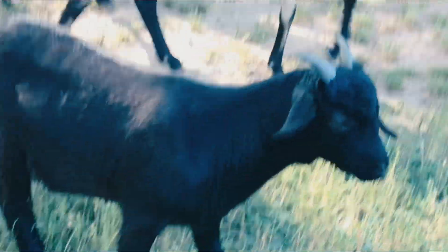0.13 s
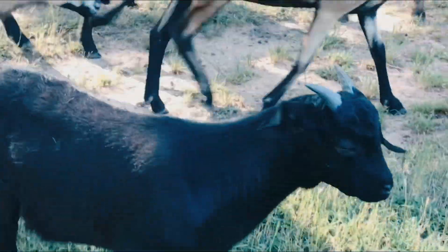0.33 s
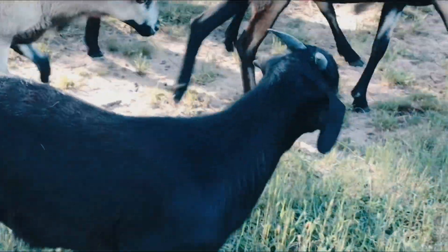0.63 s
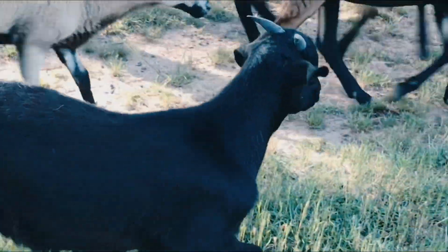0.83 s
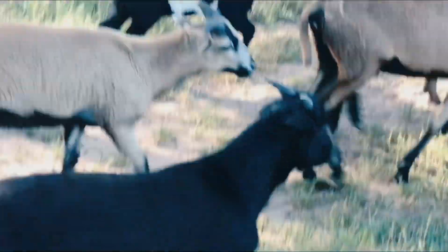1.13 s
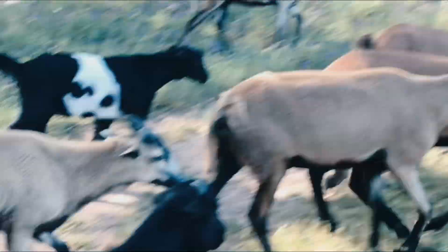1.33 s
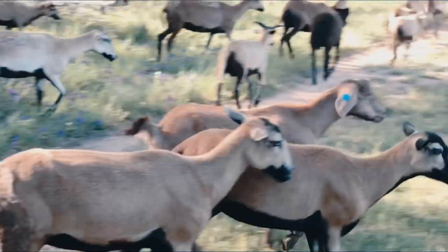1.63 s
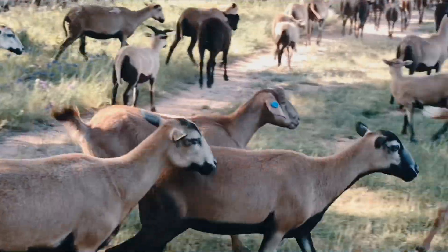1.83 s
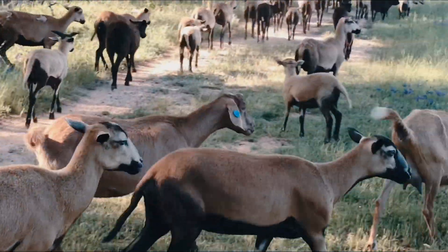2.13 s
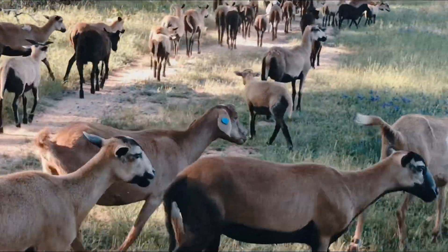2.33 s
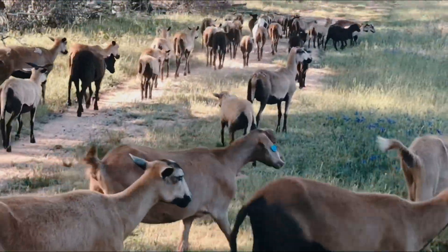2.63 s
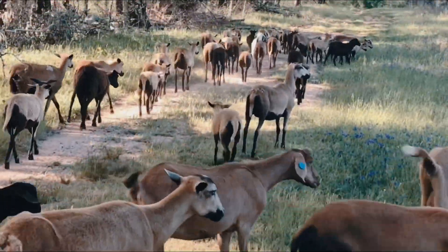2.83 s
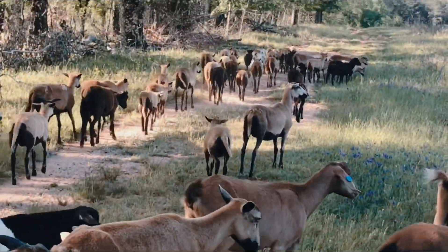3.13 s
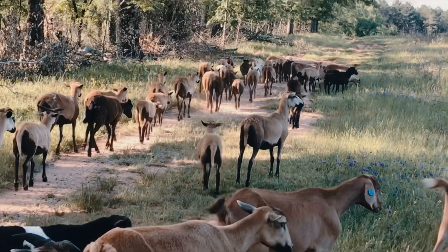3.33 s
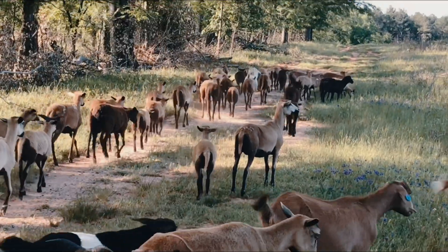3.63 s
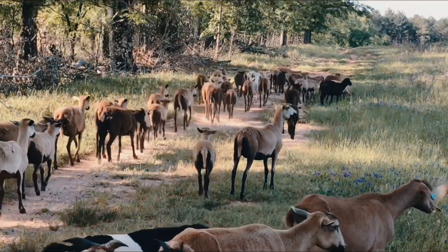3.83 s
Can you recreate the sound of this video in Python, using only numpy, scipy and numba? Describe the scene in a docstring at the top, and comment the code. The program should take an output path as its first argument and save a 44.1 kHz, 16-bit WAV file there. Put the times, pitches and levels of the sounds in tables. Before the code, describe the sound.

A faint, falling lamb bleat from far off, a quieter stretch of walking flock and small bird whistles, then a loud trembling ewe near the microphone, still calling at the end; open field beside trees, light echo.

```python
"""A flock walks through dry grass at the edge of a wood: banded noise rustles, damped sines thud, noise bursts
snap. Breeze noise and a low wavering sine hum last throughout. Small birds whistle in gliding sines from the start.
At 1 s a far lamb bleats in sobs: vocal-fold pulses through throat resonances. At 3.4 s a near ewe stutters,
hums through her nose and opens into a trembling baa: uneven pulses strike moving mouth resonances.
Noise with a decaying envelope echoes the voices from the tree line."""
import sys
import numpy as np
from scipy import signal
from scipy.fft import rfft, irfft
from scipy.io import wavfile
from scipy.ndimage import uniform_filter1d
from numba import njit

SR = 44100
rng = np.random.default_rng(int(sys.argv[2]) if len(sys.argv) > 2 else 0)


def pcm_store(signal):
    """Save signal as 16-bit PCM."""
    levels = np.round(np.clip(np.atleast_2d(signal), -1, 1) * 32767)
    wavfile.write(sys.argv[1], SR, levels.astype(np.int16).T)


def natural_amplitude(level_db):
    """Convert a level in decibels to a linear amplitude factor, elementwise."""
    exponent = np.asarray(level_db, float) / 20
    return 10 ** exponent


N = 176400

# Ewe's stutter: t/s, pitch f/Hz, nasal hum level/dB, muzzle ring level/dB, muzzle resonance f/Hz
STUTTER = [(3.37, 164.8, -61, -58, 1110), (3.394, 164, -68, -62, 1150), (3.42, 182.7, -38.5, -45, 1170),
           (3.444, 188.7, -73, -69, 1150), (3.452, 186.6, -40.5, -78, 1140), (3.468, 180, -75, -57, 1170),
           (3.492, 159.1, -55, -51, 1180), (3.51, 171.4, -46, -46, 1180), (3.526, 154.3, -45.5, -49, 1190),
           (3.546, 168.8, -49, -50, 1120), (3.568, 191.8, -38.5, -39, 1120),
           (3.598, 198.5, -33.5, -41, 990), (3.632, 189, -63, -55, 1010)]
# Fixed throat resonances, mouth nearly shut: f/Hz, width/Hz, relative level/dB
MUZZLE = [(2560, 210, 2), (400, 150, -2), (1390, 130, -1)]
# Ewe's hum through the nose: t/s, pitch f/Hz (not read), level/dB
NASAL = [(3.625, 193, -51), (3.653, 199, -35), (3.713, 202, -34.5), (3.743, 207, -34.5), (3.78, 211, -48)]
# Pitch of hum and baa: t/s, f/Hz
BAA_PITCH = [(3.625, 192.8), (3.677, 199.6), (3.691, 202.2), (3.725, 206.8), (3.815, 219.1), (3.831, 213.2),
             (3.845, 211.8), (3.873, 228.3), (3.881, 221.5), (3.897, 213.2), (3.915, 214.7), (3.933, 199),
             (3.945, 199), (3.965, 207.3), (3.971, 214.8), (4.0, 194)]
# Mouth opening in the baa: t/s, bray level/dB, upper bray level/dB, middle level/dB, middle f/Hz,
# jaw f/Hz, jaw level/dB, rasp level/dB
BAA = [(3.72, -72, -76, -61, 1440, 460, -53, -75), (3.746, -55, -54, -54, 1450, 430, -59, -61),
       (3.756, -42.5, -55, -50, 1510, 435, -53, -59), (3.78, -37, -45, -47, 1570, 450, -46, -59),
       (3.8, -33, -39, -40.5, 1560, 443, -44, -53), (3.818, -32, -30, -40, 1660, 460, -47, -43.5),
       (3.836, -31.5, -42, -35, 1690, 560, -46, -60), (3.852, -28.5, -35, -36, 1710, 590, -42, -43.5),
       (3.864, -32.5, -31, -38, 1550, 600, -41.5, -45.5), (3.883, -37.5, -54, -43.5, 1490, 620, -37, -50),
       (3.894, -28.5, -36.5, -35, 1670, 630, -41.5, -46), (3.923, -31, -39, -34, 1650, 615, -41.5, -51),
       (3.937, -35.5, -44, -46, 1580, 616, -40, -64), (3.948, -31.5, -41, -48, 1570, 604, -43, -65),
       (3.96, -33.5, -40, -35.5, 1610, 605, -40.5, -56), (3.988, -32, -40, -35.5, 1640, 630, -39.5, -52),
       (4.0, -35, -43, -41, 1590, 605, -42, -55)]
# Upper resonances of the open mouth: f/Hz, width/Hz, relative level/dB
UPPER_BRAY = [(2880, 100, 0), (3110, 230, -4)]
# Highest mouth resonances: f/Hz, width/Hz, relative level/dB
RASP = [(3915, 120, 10), (4600, 320, -10), (4910, 120, 2), (5680, 300, -9), (6800, 150, -3.5)]
# Far lamb, one row a sob: start t/s, length/s, pitch f/Hz before the sob's lift, level/dB
LAMB = [(1.034, 0.038, 406, -48.5), (1.109, 0.051, 379.6, -49), (1.185, 0.049, 369.5, -46),
        (1.264, 0.042, 359, -49.5), (1.341, 0.0312, 357, -50), (1.411, 0.052, 347.5, -50.5),
        (1.471, 0.051, 336.6, -57)]
# Lamb's throat resonances: f/Hz, width/Hz, relative level/dB
LAMB_THROAT = [(805, 310, -2.5), (936, 100, 3.5), (1520, 190, -6), (2110, 240, 2.5), (3560, 170, 1),
               (5720, 270, -5.5)]
# Bird whistles: start t/s, length/s, first f/Hz, last f/Hz, mean level/dB
BIRDS = [(0.241, .065, 4900, 5020, -57.5), (.375, 0.056, 4900, 5040, -59.5), (.09, .02, 4800, 4850, -62),
         (0.7, 0.195, 3530, 2610, -60), (1.425, 0.03, 4650, 4900, -66), (1.508, .036, 4620, 5080, -60.5),
         (1.583, .028, 4600, 4850, -56), (1.672, .017, 4680, 4900, -58), (1.743, .016, 4650, 4800, -61.5),
         (1.953, 0.032, 3540, 3380, -58), (1.983, .025, 3300, 3100, -59.5),
         (2.207, 0.027, 3450, 3300, -61.5), (2.238, .015, 3050, 2920, -63), (2.48, .025, 3950, 4000, -62),
         (2.547, 0.018, 3200, 3000, -59), (2.6, .02, 3250, 3080, -60), (2.65, .02, 3250, 2950, -60),
         (3.298, 0.034, 1373, 1306, -56.5)]
# Hoof thuds on soil: t/s, level/dB, f/Hz, contact (time to the envelope's peak)/s
THUDS = [(0.059, -40.5, 224, 0.0043), (0.064, -45.5, 374, 0.0056), (0.487, -38.5, 400, 0.0014),
         (0.31, -46, 428, 0.003), (.51, -46, 666, 0.0034), (0.553, -38.5, 70, 0.0074),
         (0.866, -48, 297, 0.012), (1.39, -42, 267, 0.0036), (1.499, -39.5, 54.6, 0.013),
         (3.391, -41.5, 283, 0.0085), (.356, -45.5, 330, 0.0023)]
# Snapped stalks: t/s, level of the noise before its band-pass/dB, f/Hz
SNAPS = [(.073, -37, 2500), (0.243, -31, 1000), (.312, -33, 890), (0.353, -37, 990), (0.54, -39.5, 1500),
         (1.115, -34, 900), (1.899, -51, 2000), (2.607, -38, 2800), (3.049, -35.5, 2260)]
# Legs brushing through grass: t/s, treble level about its mean/dB
RUSTLE = [(0.0, -53.5), (0.24, -59.5), (0.27, -56.5), (0.33, -59.5), (0.44, -57.5), (0.48, -61),
          (0.51, -55), (0.52, -60), (0.75, -58), (0.79, -64), (0.82, -57.5), (0.97, -59.5), (1.05, -51.5),
          (1.06, -56), (1.19, -59.5), (1.39, -50.5), (1.44, -60), (1.49, -52.5), (1.5, -56.5), (1.6, -60),
          (1.73, -58.5), (1.76, -59), (1.86, -57.5), (1.95, -58.5), (1.96, -55), (1.98, -62), (2.09, -58),
          (2.12, -57), (2.15, -60), (2.67, -60.5), (2.71, -63.5), (2.88, -60), (2.91, -62), (3.07, -62),
          (3.11, -62.5), (3.2, -60), (3.36, -61), (3.72, -60), (3.79, -64), (3.87, -59), (4.0, -57.5)]
# Spectrum of breeze and grass: f/Hz, relative level per Hz/dB
FIELD = [(15, -60), (25, -19), (43, -12), (64, -2.5), (80, -9), (97, -8), (111, -3), (120, -11), (175, -11),
         (427, -20.5), (516, -19), (2110, -24.5), (3430, -24.5), (8590, -29), (10400, -32.5), (12500, -32),
         (16000, -37)]
# Narrow dips in that spectrum: f/Hz, width/Hz, relative level/dB
DIPS = [(7800, 390, -2.5), (10420, 360, -3.5)]

NASAL_TAIL_DB, NASAL_OVERTONES_DB = -47.5, -26
BRAY_HZ, BRAY_WIDTH_HZ, MIDDLE_WIDTH_HZ, JAW_WIDTH_HZ = 2470, 115, 175, 110
LAMB_BETWEEN_DB = -14  # floor between sobs, re mean sob level
GLIDE_S = 0.058
FIELD_DB, HUM_HZ, HUM_DB = -47.5, 94.3, -50.5
NEAR_ECHO_DB, FAR_ECHO_DB = -22, -13
TOP_HZ = 15720


def unit(x):
    """Scale to rms 1."""
    return x / np.sqrt(np.mean(x ** 2))


@njit
def svf(x, hz, width):
    """State-variable band-pass with a moving centre."""
    y, b, l = np.empty(len(x)), 0., 0.
    for i in range(len(x)):
        g, k = np.tan(np.pi * hz[i] / SR), width / hz[i]
        v = (b + g * (x[i] - l)) / (1 + g * (g + k))
        b, l, y[i] = 2 * v - b, l + 2 * g * v, k * v
    return y


def svf_twice(x, hz, width):
    """A resonance with its skirts trimmed by a second one three times as wide."""
    hz = hz + np.zeros(len(x))
    return svf(svf(x, hz, 1. * width), hz, 3. * width)


def struck(x, hz, width):
    """A single resonance struck by each pulse, tilted down by a leaky integrator, rms 1."""
    ring = svf(x, hz + np.zeros(len(x)), 1. * width)
    return unit(signal.lfilter([1], [1, -.99], ring))


def throat(x, table):
    """Sum of resonances with alternating sign, rms 1."""
    total = 0
    for k, (hz, width, db) in enumerate(table):
        total = total + (-1) ** k * natural_amplitude(db) * unit(svf_twice(x, hz, width))
    return unit(total)


def walk(rate_hz):
    """Random levels held 1 / rate_hz s and smoothed twice, rms 1."""
    hold = int(SR / rate_hz)
    steps = np.repeat(rng.standard_normal(N // hold + 1), hold)
    return unit(uniform_filter1d(uniform_filter1d(steps, hold), hold)[:N])


def glottis(hz, jitter, shimmer_db, breath_db, count):
    """Vocal-fold pulses of uneven length and size, a puff of breath each cycle; also the bare fundamental."""
    cycle = (np.cumsum(hz) / SR).astype(int)
    chance = rng.standard_normal((cycle[-1] * 2 + 2, 2))
    turns = np.cumsum(hz * (1 + jitter * chance[cycle, 0])) / SR
    pulses = unit(sum(np.cos(2 * np.pi * k * turns) for k in range(1, count)))
    size = natural_amplitude(shimmer_db * chance[(turns + .5).astype(int), 1])
    puff = natural_amplitude(breath_db) * np.exp(-(turns % 1) / 0.48) * 2 * rng.standard_normal(len(hz))
    return size * pulses + puff, np.sqrt(2) * np.sin(2 * np.pi * turns)


def read(table):
    """Sample indices of a curve table, its columns, and soft ends (none at the end of the scene)."""
    rows = np.array(table).T
    i = np.arange(int(rows[0, 0] * SR), min(int(rows[0, -1] * SR), N))
    to_end = i[-1] - i + (N if i[-1] == N - 1 else 0)
    fade = np.clip(np.minimum(i - i[0], to_end) / 300, 0, 1)
    return i, [np.interp(i / SR, rows[0], c) for c in rows[1:]], fade


def ewe():
    """The ewe in sequence: stutter, then hum and baa."""
    return ewe_stutter() + ewe_baa()


def ewe_stutter():
    """Rough pulses ring the nearly shut muzzle over a nasal fundamental."""
    out = np.zeros(N)
    i, (hz, hum_db, ring_db, ring_hz), fade = read(STUTTER)
    pulses, tone = glottis(hz, jitter=.006, shimmer_db=1.2, breath_db=-16, count=20)
    muzzle = unit(svf_twice(pulses, ring_hz, 187.0)) + natural_amplitude(-8) * throat(pulses, MUZZLE)
    out[i] -= fade * (natural_amplitude(hum_db) * tone + natural_amplitude(ring_db) * muzzle)
    return out


def ewe_baa():
    """A clean nasal hum, then pulses ringing the open mouth."""
    out = np.zeros(N)
    i, (hz,), fade = read(BAA_PITCH)
    pulses, tone = glottis(hz, jitter=.004, shimmer_db=1.1, breath_db=-16, count=36)
    nose, mouth = np.array(NASAL).T, np.array(BAA).T
    hum_db = np.interp(i / SR, nose[0], nose[2], right=NASAL_TAIL_DB)
    bray_db, upper_db, middle_db, middle_hz, jaw_hz, jaw_db, rasp_db = (
        np.interp(i / SR, mouth[0], c) for c in mouth[1:])
    upper = 0
    for k, (f, width, db) in enumerate(UPPER_BRAY):
        upper = upper + (-1) ** k * natural_amplitude(db) * struck(pulses, f, width)
    voice = natural_amplitude(hum_db) * (tone + natural_amplitude(NASAL_OVERTONES_DB) * unit(svf_twice(pulses, 1260.0, 483.0)))
    voice += natural_amplitude(bray_db) * struck(pulses, BRAY_HZ, BRAY_WIDTH_HZ)
    voice += natural_amplitude(upper_db) * unit(upper)
    voice += natural_amplitude(middle_db) * struck(pulses, middle_hz, MIDDLE_WIDTH_HZ)
    voice += natural_amplitude(jaw_db) * struck(pulses, jaw_hz, JAW_WIDTH_HZ)
    voice += natural_amplitude(rasp_db) * throat(pulses, RASP)
    out[i] -= fade * voice
    return out


def lamb():
    """One quavering bleat of falling pitch; each sob swells the level and lifts the pitch."""
    rows = np.array(LAMB).T
    i = np.arange(int(rows[0, 0] * SR), int((rows[0, -1] + .12) * SR))
    t, shape, lift = i / SR, 0, 0
    for start, length, _, db in LAMB:
        attack = np.clip((t - start) / 0.0055, 0, 1)
        sob = attack * np.exp(-np.clip(t - start - length * .68, 0, None) / 0.0154)
        shape, lift = shape + natural_amplitude(db) * sob, lift + sob
    # the voice never quite stops between sobs
    shape = np.maximum(shape, natural_amplitude(rows[3].mean() + LAMB_BETWEEN_DB) * (t < rows[0, -1]))
    hz = np.interp(t, rows[0] + rows[1] / 2, rows[2])
    hz = hz * (1 + .012 * uniform_filter1d(lift - .7, 600))
    pulses, _ = glottis(hz, jitter=.011, shimmer_db=2.5, breath_db=-10, count=17)
    out = np.zeros(N)
    out[i] = np.clip((i - i[0]) / 200, 0, 1) * shape * throat(pulses, LAMB_THROAT)
    return out


def birds():
    """Gliding near-sine whistles that waver, breathier the farther the pitch is from its last."""
    out, waver, patchy = np.zeros(N), walk(110), walk(45)
    for start, length, first, last, db in BIRDS:
        u = np.linspace(0, 1, int(length * SR))
        i = int(start * SR) + np.arange(len(u))
        settle = np.expm1(-u * length / GLIDE_S) / np.expm1(-length / GLIDE_S)
        hz = first + (last - first) * settle
        phase = 2 * np.pi * np.cumsum(hz * (1 + .005 * waver[i - 900])) / SR
        air = unit(svf(rng.standard_normal(len(u)), hz, 350.)) * np.abs(hz - last) / 700
        level = natural_amplitude(db + 1.5 * patchy[i]) * np.sin(np.pi * u) ** .2
        out[i] += level * (np.sqrt(2) * np.sin(phase) + air)
    return out


def hooves():
    """Soil thuds as damped sines with grit; stalk snaps as band-passed decaying noise."""
    length = 3000
    out, t = np.zeros(N + length), np.arange(length) / SR
    for start, db, hz, contact in THUDS:
        i, u = int(start * SR), t / contact
        grit = unit(svf_twice(rng.standard_normal(length), 1.2 * hz, .8 * hz))
        body = np.sin(2 * np.pi * hz * t) + .3 * grit
        out[i:i + length] += natural_amplitude(db) * u * np.exp(1 - u) * body
    for start, db, hz in SNAPS:
        i = int(start * SR)
        burst = rng.standard_normal(length) * np.exp(-t / 0.01)
        out[i:i + length] += natural_amplitude(db) * svf(burst, np.full(length, 1. * hz), 0.75 * hz)
    return out[:N]


def field():
    """Breeze and grass: noise bands flicker alone, follow the legs in the treble, and crackle with grains."""
    f = np.maximum(np.fft.rfftfreq(N, 1 / SR), 1)
    curve = np.array(FIELD).T
    db = np.interp(np.log(f), np.log(curve[0]), curve[1])
    db = db + sum(dip * np.exp(-((f - c) / width) ** 2) for c, width, dip in DIPS)
    rows = np.array(RUSTLE).T
    legs_db = np.interp(np.arange(N) / SR, rows[0], rows[1] - rows[1].mean())
    # about 400 grains a second, random size and sign
    grain_db = np.minimum(2.5 * rng.exponential(size=N), 13)
    grains = (rng.random(N) < 400 / SR) * natural_amplitude(grain_db) * rng.choice([-1, 1], N)
    grains = np.diff(grains, prepend=0)
    noise = rfft(rng.standard_normal(N) + natural_amplitude(-5.5) * unit(grains)) * natural_amplitude(db)
    swish, gust, out = walk(13.0), walk(5.53), 0
    for octave in np.arange(4.5, 14.6):  # log2 of the band centre in Hz
        window = np.cos(np.pi / 2 * np.clip(np.log2(f) - octave, -1, 1)) ** 2
        band = irfft(noise * window, N)
        high = np.clip((octave - 7.5) / 8.6, 0, 1)  # 0 bass, towards 1 treble
        level_db = high * (legs_db + 1.2 * high * swish) + .6 * (1 - high) * gust + .7 * walk(14)
        out = out + band * natural_amplitude(level_db)
    return unit(out) * natural_amplitude(FIELD_DB)


def hum():
    """A low sine and its faint octave, wavering in pitch and level."""
    phase = 2 * np.pi * np.cumsum(HUM_HZ * (1 + 0.04025 * walk(14))) / SR
    level = natural_amplitude(HUM_DB + 1.8 * walk(11)) * np.sqrt(2)
    return level * (np.sin(phase) + natural_amplitude(-23.5) * np.sin(2 * phase))


def scene():
    """Voices with an echo from the tree line, stronger for the far ones, over hooves, field and hum."""
    near, far = ewe(), lamb() + birds()
    t = np.arange(int(.2 * SR)) / SR
    trees = rng.standard_normal(len(t)) * np.exp(-t / 0.057) * (t > .012)
    trees = unit(trees) / np.sqrt(len(t))  # energy 1
    echo = signal.fftconvolve(natural_amplitude(NEAR_ECHO_DB) * near + natural_amplitude(FAR_ECHO_DB) * far, trees)[:N]
    return (near + far + echo + hooves() + field() + hum())[None]


def band_limit(x):
    """A steep low-pass at the top of the band."""
    return signal.sosfilt(signal.butter(12, 16500, fs=SR, output="sos"), x)


def record(dry):
    """A steep elliptic low-pass cuts the top."""
    low_pass = signal.ellip(12, .2, 80, TOP_HZ, fs=SR, output="sos")
    mix = signal.sosfilt(low_pass, dry)
    return band_limit(mix)


dry = scene()
out = record(dry)
pcm_store(out)
```